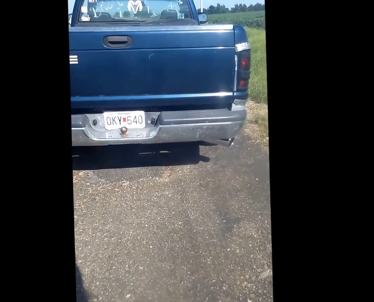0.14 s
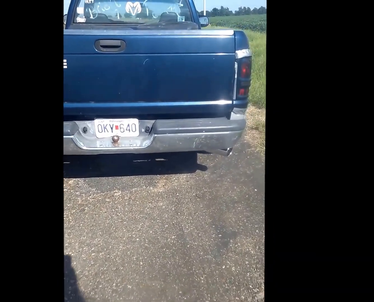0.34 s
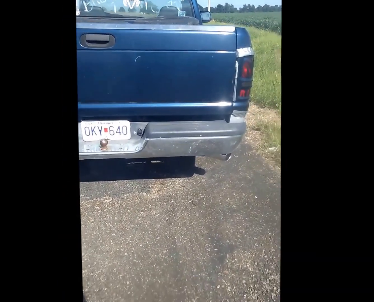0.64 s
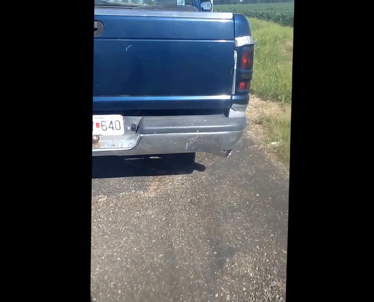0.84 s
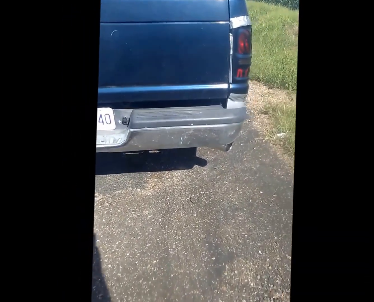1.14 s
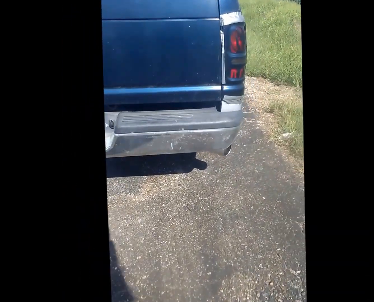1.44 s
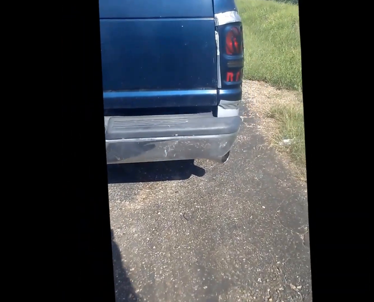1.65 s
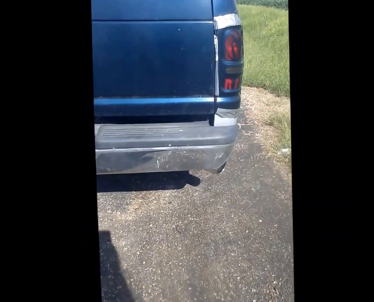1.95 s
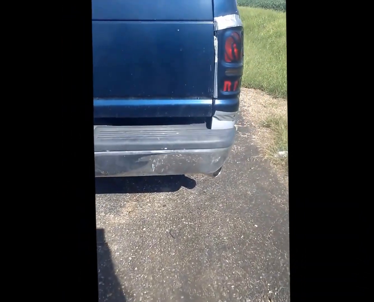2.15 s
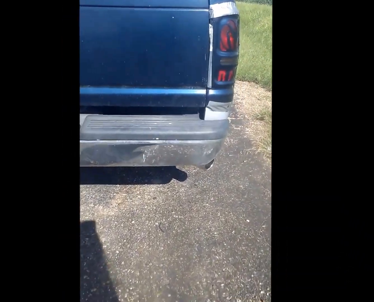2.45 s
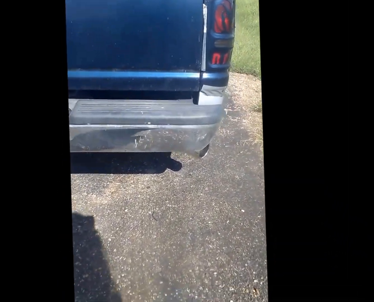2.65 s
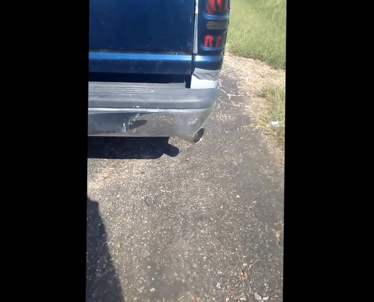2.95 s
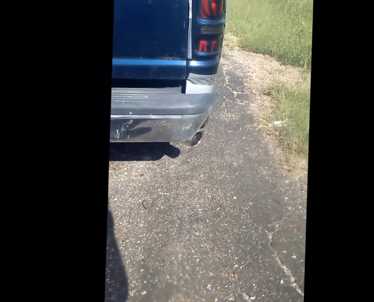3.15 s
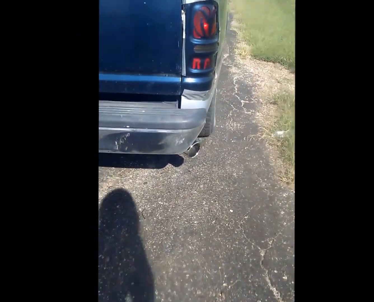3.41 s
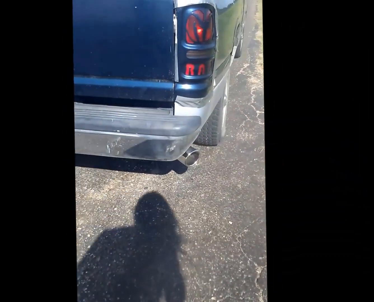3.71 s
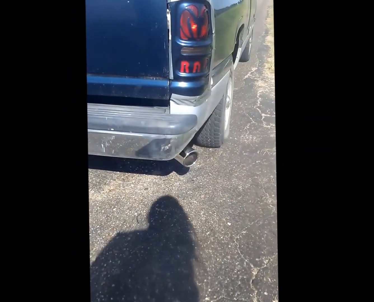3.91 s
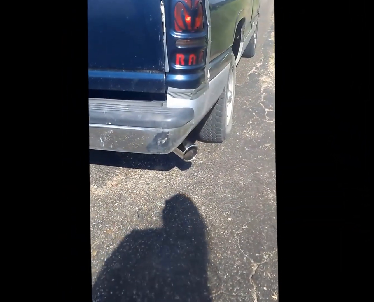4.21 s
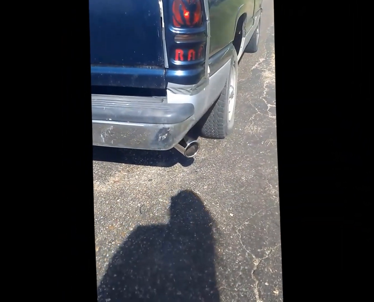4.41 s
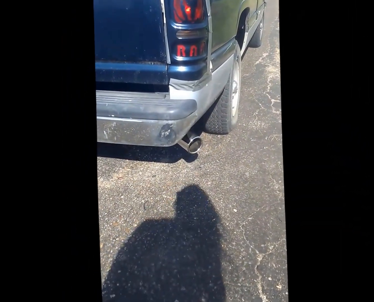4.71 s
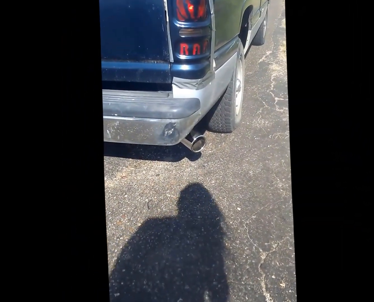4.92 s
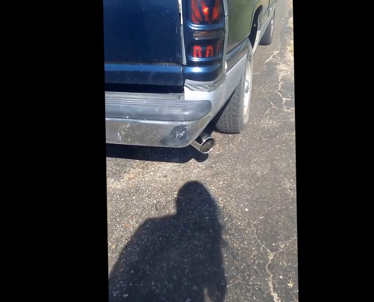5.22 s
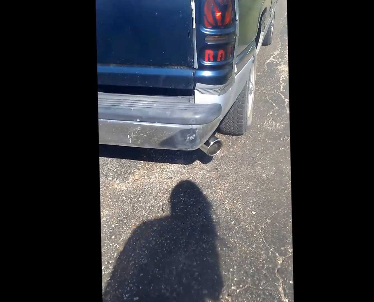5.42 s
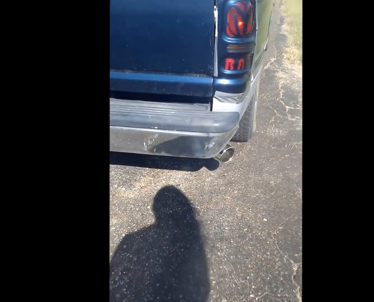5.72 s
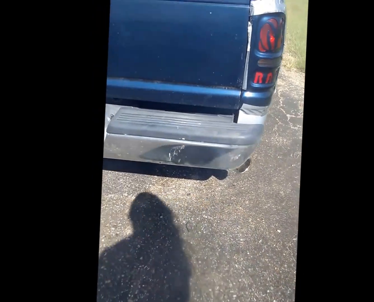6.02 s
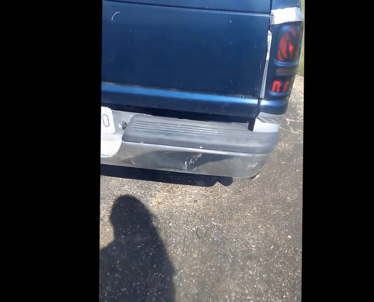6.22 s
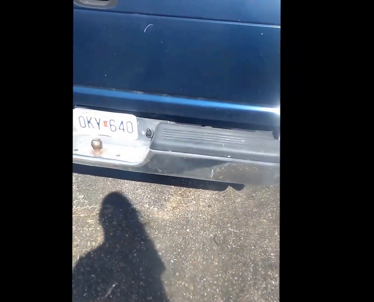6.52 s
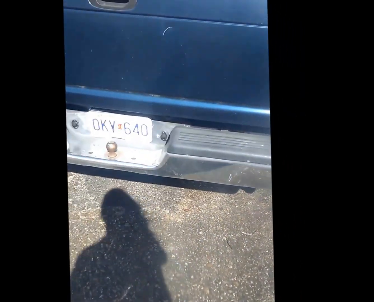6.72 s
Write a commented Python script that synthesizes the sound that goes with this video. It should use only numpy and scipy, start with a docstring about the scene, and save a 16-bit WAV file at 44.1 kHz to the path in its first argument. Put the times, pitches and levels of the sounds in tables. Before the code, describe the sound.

A pickup truck idles loudly from start to finish, heard just behind the bumper on open pavement. The exhaust has a deep throb and a regular, lopsided chug, with a little rasp and a thin hiss that pulses with each beat. The engine speed stays steady. The microphone drifts toward the tailpipe, stays right beside it from about 3.7 to 5.7 seconds, where the hum is stronger and the chug more marked, then moves back. Very faint ticks of hot metal are scattered throughout. Grit clicks briefly underfoot at about 0.4 seconds, twice around 2, and again near 3.4, 4.2 and 5 seconds. A low wind rumble lies underneath and rises from about 5.5 seconds. Short gusts buffet the microphone from 5.9 seconds, strongest around 6.4, while the idle carries on to the end at nearly 7 seconds.

```python
"""Open pavement, microphone just behind the bumper of a V8 pickup idling through straight pipes. Each firing
sends a pressure pulse and a puff of hissing gas down the ringing pipe; one bank arrives late, and one cylinder
barks much louder than the rest, which gives the lope. The hot metal pings faintly and grit clicks underfoot.
The microphone drifts in close to the tailpipe and back, wind buffets it near the end, and a limiter holds the
peaks."""
import sys
import numpy as np
from scipy import signal
from scipy.fft import rfft, irfft
from scipy.io import wavfile
from scipy.ndimage import uniform_filter1d, minimum_filter1d

SR = 44100
rng = np.random.default_rng(int(sys.argv[2]) if len(sys.argv) > 2 else 0)


def generate_wav(sig):
    """Save sig (samples, or channels by samples) to the path in sys.argv[1] as 16-bit PCM at SR."""
    pcm = np.round(np.clip(np.atleast_2d(sig).T, -1, 1) * 32767).astype(np.int16)
    wavfile.write(sys.argv[1], SR, pcm)


N = 302526
T = np.arange(N) / SR

# microphone's path: (time [s], place [0 behind the bumper, 1 at the tailpipe])
MIC_PATH = [(0, 0.056), (2, 0.35), (2.9, 0.39), (3.7, 0.99), (5.7, 1), (6.15, 0.46), (6.86, 0.12)]
# idle speed: (time [s], crank speed [rpm])
IDLE_SPEED = [(0, 655.3), (.95, 647.9), (1.45, 657.7), (2, 653.8), (2.95, 655.8), (3.5, 647.9),
              (5.3, 652.9), (5.9, 655.3), (6.86, 653.9)]
# cylinders in firing order, levels relative to one another: (bank [0 or 1], pulse [dB], bark [dB], hiss [dB])
FIRING_ORDER = [(0, -1.5, -2, 19), (1, 0.5, -3.5, 20.5), (1, -1.5, -3.5, 17), (0, 3, 0, 19.5),
                (1, 2.5, -1.5, 15), (0, -6, -7.5, 26.5), (0, 2.5, 10, 32), (1, 0, -3, 18.5)]
# low standing waves of the pipe:
# (frequency [Hz], width [Hz], level behind the bumper [dB], level at the tailpipe [dB], polarity [+/-1])
THROB_MODES = [(46.34, 11.1, -0.5, -3.5, -1), (74.6, 21.95, 3.5, -0.5, 1), (111.37, 3.28, -2, 7.5, 1),
               (118, 47, -6, -7, -1), (145.6, 10.1, -4, -11.5, 1)]
# middle standing waves of the pipe:
# (frequency [Hz], width [Hz], level behind the bumper [dB], level at the tailpipe [dB], polarity [+/-1])
BARK_MODES = [(200.2, 6.7, 4.5, -7.5, -1), (211.9, 6.65, -9, 3, -1), (241.7, 10, -10, -5.5, 1),
              (270.9, 10.2, -5, -3.5, -1), (312, 30.7, -19, -8.5, 1), (353.2, 14.5, -19.5, -16, -1)]
# bark at the microphone: (time [s], level [dB])
BARK_LEVELS = [(0, -18), (.8, -17.5), (2.3, -21.5), (3.1, -19.5), (4.2, -22.5), (5.6, -19.5), (6.86, -24)]
# higher resonances that the puffs stir:
# (frequency [Hz], width [Hz], level behind the bumper [dB], level at the tailpipe [dB])
RASP_MODES = [(370.5, 72, 5, 1), (479.5, 95, -6, -12), (553, 62, -9, -6.5), (672, 19, -3, -3),
              (747.7, 66, -15, -3), (888, 56, -14, -13.5), (1057, 40, -19, -16), (1598, 66, -29.5, -25),
              (1917, 127, -29.5, -25.5)]
# hiss at the microphone: (time [s], level [dB])
HISS_LEVELS = [(0, -37), (.75, -35.5), (1.6, -39.5), (5.6, -40), (6.86, -42)]
# spectrum of the hiss from behind the bumper: (frequency [Hz], relative level [dB])
HISS_AT_BUMPER = [(710, -11), (1200, -10.5), (1520, -5.5), (1800, -9), (2100, -9), (2260, -8), (3080, -6.5),
                  (4480, -11), (5620, -2), (7290, -5), (8250, 1), (9350, -6), (10700, -6), (13700, 2),
                  (14300, -8.5)]
# spectrum of the hiss close to the tailpipe: (frequency [Hz], relative level [dB])
HISS_AT_TAILPIPE = [(710, -33), (1200, 0.5), (1370, -4), (1540, 0), (1760, -0.5), (1910, -0.5), (2140, -2),
                    (2840, -1), (4570, -4), (5340, 1), (8340, 2.5), (9350, -1), (11400, -5.5), (13700, 9.5),
                    (14300, -1.5)]
# modes of the hot pipe's metal: (frequency [Hz], width [Hz], relative level [dB])
METAL_MODES = [(1580, 73, 1), (1910, 86, -3), (2250, 60, 0), (2590, 80, -3), (3390, 100, -3),
               (5850, 200, 2.5)]
# spectrum of the wind's rumble on the microphone: (frequency [Hz], relative level [dB])
RUMBLE_SPECTRUM = [(3, -21), (12, 22), (28, -20), (60, -7.5), (120, -3.5), (250, -14), (500, -38),
                   (1200, -76)]
# gusts on the microphone port: (time [s], level [dB], half-length [s])
PORT_GUSTS = [(1.775, -28.5, 0.025), (5.918, -20, 0.026), (5.973, -18, 0.03), (6.074, -24, 0.024),
              (6.343, -21, 0.016), (6.414, -10.5, 0.02), (6.499, -18.5, 0.0071), (6.702, -19, 0.011),
              (6.833, -22.5, 0.029)]
# spectrum of the gusts: (frequency [Hz], relative level [dB])
GUST_SPECTRUM = [(40, -18), (150, 1), (380, 3), (600, -7.5), (1000, -20), (1700, -33), (2800, -42),
                 (6000, -63)]
# grit clicking underfoot: (time [s], level [dB], tilt [dB per octave])
GRIT_CLICKS = [(.413, -21, -.5), (1.925, -32, -3), (2.024, -28, -3), (3.373, -29, -7), (4.2, -31, -4),
               (5.017, -28, 0)]
# spectrum of a click before its tilt: (frequency [Hz], relative level [dB])
GRIT_SPECTRUM = [(800, -10), (1600, 12), (3000, 4.5), (4200, 4), (5500, 13), (6800, 20), (8000, -30),
                 (14000, -27)]


def amp(db):
    """Decibels to gain."""
    return 10 ** (np.asarray(db) / 20)


def unit_rms(x):
    """Scales to rms 1."""
    return x / np.sqrt(np.mean(x ** 2) + 1e-20)


def curve(rows):
    """A (time, value) table at every sample."""
    return np.interp(T, *np.transpose(rows))


def noise(spectrum):
    """Noise of rms 1 with the given spectrum."""
    hz, db = np.transpose(spectrum)
    gain = amp(np.interp(np.log(np.fft.rfftfreq(N, 1 / SR) + 1), np.log(hz + 1), db))
    return unit_rms(irfft(rfft(rng.standard_normal(N)) * gain, N))


def resonate(x, hz, width):
    """A resonance with a peak gain of about 1."""
    r = np.exp(-np.pi * width / SR)
    return 2 * signal.lfilter([1 - r], [1, -r * np.exp(2j * np.pi * hz / SR)], x).real


def mic_gain(place, bumper_db, tailpipe_db):
    """Gain at the microphone's place between bumper and tailpipe."""
    return amp(bumper_db + (tailpipe_db - bumper_db) * place)


def firings(first_s=0.005473, bank_lag_s=0.00636, jitter_s=0.00022):
    """Arrival time and cylinder of each firing; bank 1's pulses take a longer way to the microphone."""
    cycles = np.cumsum(curve(IDLE_SPEED)) / (2 * 60 * SR)  # two turns of the crank a cycle
    count = np.arange(int(len(FIRING_ORDER) * cycles[-1]) + 1)
    cylinder = count % len(FIRING_ORDER)
    bank = np.array(FIRING_ORDER)[cylinder, 0]
    times = np.interp(count / len(FIRING_ORDER), cycles, T) + first_s + bank_lag_s * bank
    return times + jitter_s * rng.standard_normal(len(times)), cylinder


def pulses(times, db, spread_db):
    """One impulse a firing; no two burn quite alike."""
    strength = amp(db + spread_db * np.clip(rng.standard_normal(len(times)), -2, 2))
    samples = np.round(abs(times) * SR).astype(int)
    return unit_rms(np.bincount(samples, strength, N)[:N])


def puffs(train, half_length_s, lag_s):
    """The gas flow swells and ebbs smoothly around each pulse."""
    t = np.arange(-SR // 20, SR // 20) / SR
    swell = np.exp(-((t - lag_s) / half_length_s) ** 2)
    return unit_rms(signal.oaconvolve(train, swell, "same"))


def standing_waves(drive, modes, place, top_hz):
    """The pipe's ringing from the microphone's place; the long pipe swallows the treble."""
    waves = sum(polarity * mic_gain(place, *levels) * resonate(drive, hz, width)
                for hz, width, *levels, polarity in modes)
    return unit_rms(signal.sosfilt(signal.butter(2, top_hz, fs=SR, output="sos"), waves))


def throb(train, place):
    """Pressure pulses ring the lowest standing waves."""
    waves = standing_waves(train, THROB_MODES, place, top_hz=467)
    return mic_gain(place, bumper_db=-7, tailpipe_db=-5.5) * waves


def bark(train, place, turbulence=0.4):
    """The steep front of each pulse, with a little turbulence, rings the middle standing waves."""
    gas = puffs(train, half_length_s=0.003, lag_s=0.0056) * rng.standard_normal(N)
    waves = standing_waves(train + turbulence * gas, BARK_MODES, place, top_hz=500)
    return amp(curve(BARK_LEVELS)) * waves


def rasp(train, place, front=0.5, approach_db=6, approach_s=0.94):
    """Each puff leaves the pipe turbulent and stirs its higher resonances."""
    gas = front * train + puffs(train, half_length_s=0.0057, lag_s=0.0055) * rng.standard_normal(N)
    rings = sum(mic_gain(place, *levels) * resonate(resonate(gas, hz, width), hz, width)
                for hz, width, *levels in RASP_MODES)
    approach = amp(-approach_db * np.maximum(1 - T / approach_s, 0))  # the microphone nears the truck
    return mic_gain(place, bumper_db=-34, tailpipe_db=-35) * approach * unit_rms(rings)


def hiss(train, place, steady_flow=2.47, whistle_hz=8240, width_hz=280):
    """Gas hisses over the rim of the pipe, surging with the puffs, with a thin whistle on top."""
    surge = unit_rms(steady_flow + puffs(train, half_length_s=0.0082, lag_s=0.0077))
    jet = np.sqrt(1 - place) * noise(HISS_AT_BUMPER) + np.sqrt(place) * noise(HISS_AT_TAILPIPE)
    band = resonate(rng.standard_normal(N), whistle_hz, width_hz)
    whistle = unit_rms(resonate(band, whistle_hz, width_hz))
    jet_db = curve(HISS_LEVELS)
    whistle_db = -46.5 + 2.8 * (jet_db + 36)  # comes up with strong hiss
    return surge * (amp(jet_db) * jet + amp(whistle_db) * whistle)


def hot_pipe_pings(per_s=33, level_db=-55.5, spread_db=5):
    """Small ticks of uneven size ring the hot metal at random moments."""
    strength = amp(spread_db * np.minimum(rng.exponential(size=N), 2.5))
    ticks = strength * (rng.random(N) < per_s / SR)
    metal = sum(amp(db) * resonate(ticks, hz, width) for hz, width, db in METAL_MODES)
    return amp(level_db) * unit_rms(metal)


def wind(rise_s=(5.44, 6.84), rumble_db=(-17, -6), eddy_db=4):
    """A breeze rumbles on the microphone and rises late; eddies of short gusts flutter on its port."""
    gusts = sum(amp(db) * np.exp(-2 * ((T - at) / half_length) ** 2) for at, db, half_length in PORT_GUSTS)
    swirl = noise([(20, -16), (120, 21), (400, -26), (2000, -92)])
    eddies = unit_rms(amp(eddy_db * np.clip(swirl, -2, 2)))
    rumble = amp(np.interp(T, rise_s, rumble_db)) * noise(RUMBLE_SPECTRUM)
    return rumble + gusts * eddies * noise(GUST_SPECTRUM)


def grit(decay_s=0.0022):
    """Grit underfoot clicks on the pavement and dies at once; some grains are duller than others."""
    clicks = np.zeros(N)
    for at, db, tilt in GRIT_CLICKS:
        spectrum = [(hz, level + tilt * np.log2(hz)) for hz, level in GRIT_SPECTRUM]
        envelope = (T >= at) * np.exp(-abs(T - at) / decay_s)
        clicks += amp(db) * envelope * noise(spectrum)
    return clicks


def scene(mean_spit_db=1.3, rasp_contrast=0.45):
    """One microphone hears the same firings drive throb, bark, rasp and hiss, amid pings, wind and grit."""
    times, cylinder = firings()
    _, pulse_db, bark_db, hiss_db = np.array(FIRING_ORDER)[cylinder].T
    spit_db = mean_spit_db * rng.exponential(size=len(times))  # now and then a firing burns harder
    place = curve(MIC_PATH)
    # the one loud cylinder stands out most at the tailpipe
    chug_db = (bark_db - bark_db.mean()) * (.5 + .5 * np.interp(times, T, place))
    exhaust = throb(pulses(times, pulse_db, spread_db=1.2), place)
    exhaust += bark(pulses(times, chug_db, spread_db=1.8), place)
    exhaust += rasp(pulses(times, rasp_contrast * chug_db + spit_db, spread_db=0), place)
    exhaust += hiss(pulses(times, hiss_db + spit_db, spread_db=3.5), place)
    return (exhaust + wind() + grit() + hot_pipe_pings())[None]


def record(dry, threshold=0.83, hold_s=0.0067, firmness=0.85, top_hz=14350):
    """A fast limiter turns the sound down around each tall peak; a steep low-pass cuts the top treble."""
    hold = int(hold_s * SR) + 1
    gain = minimum_filter1d(threshold / np.maximum(abs(dry), threshold), 2 * hold) ** firmness
    limited = dry * uniform_filter1d(uniform_filter1d(gain, hold), hold)
    lowpass = signal.firwin(1023, top_hz, window=("kaiser", 9), fs=SR)
    return signal.oaconvolve(limited, lowpass[None], "same")


dry = scene()
out = record(dry)
generate_wav(out)
```